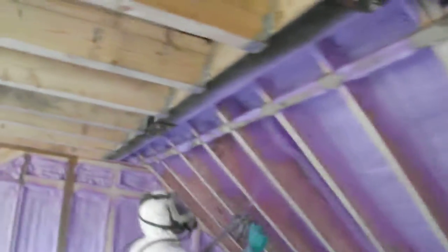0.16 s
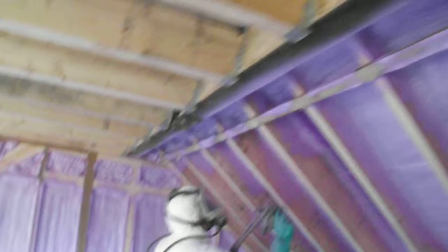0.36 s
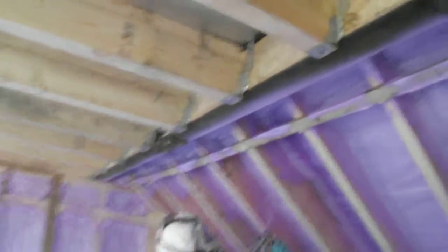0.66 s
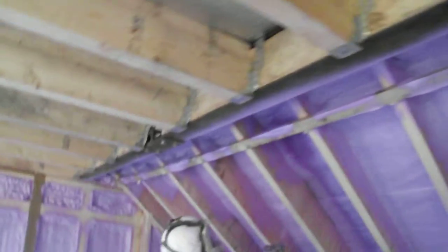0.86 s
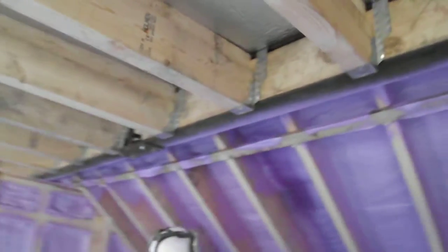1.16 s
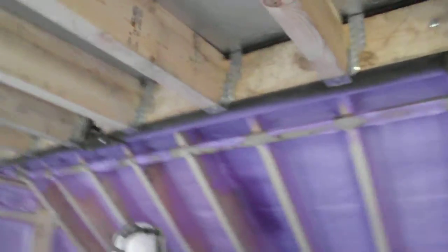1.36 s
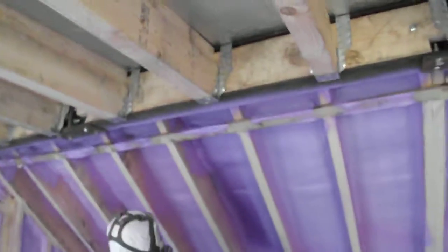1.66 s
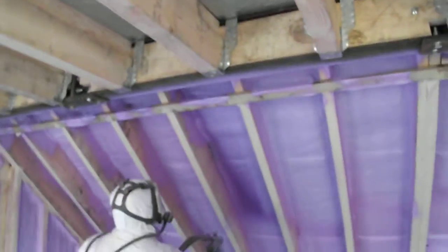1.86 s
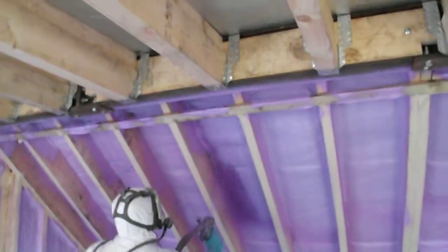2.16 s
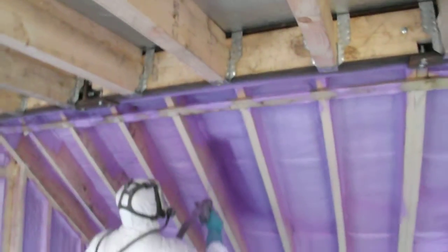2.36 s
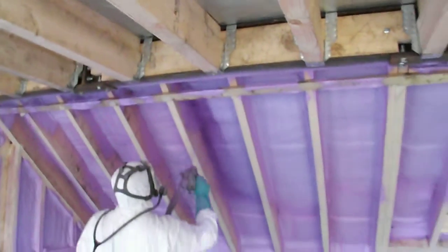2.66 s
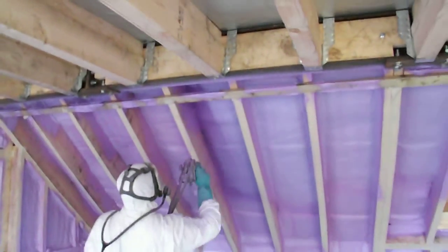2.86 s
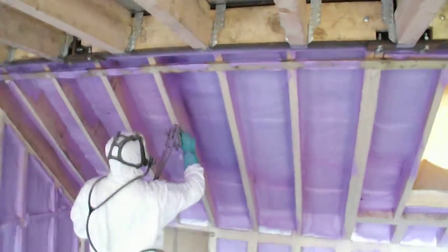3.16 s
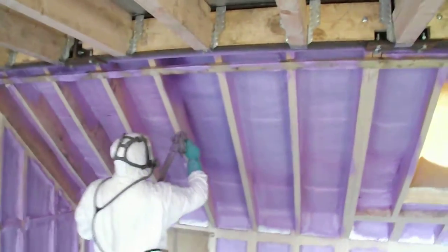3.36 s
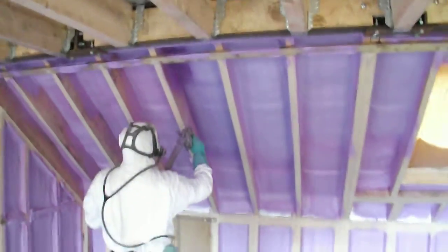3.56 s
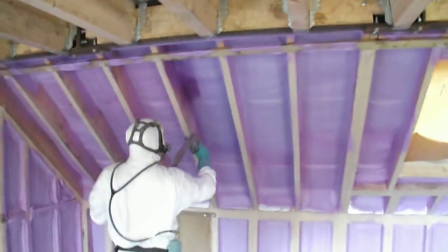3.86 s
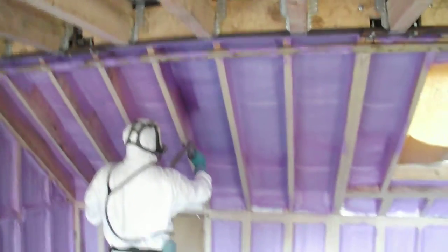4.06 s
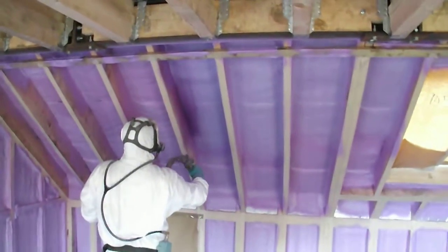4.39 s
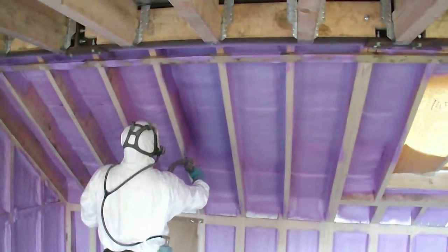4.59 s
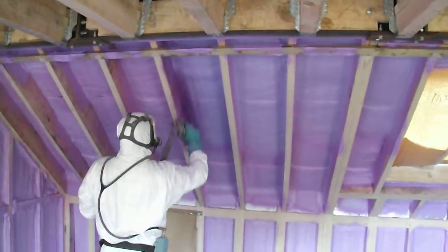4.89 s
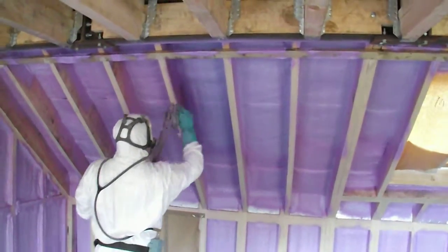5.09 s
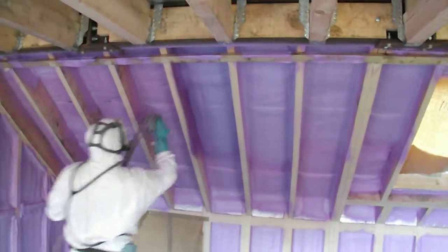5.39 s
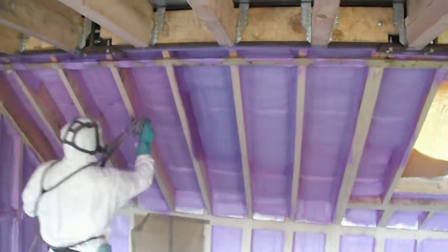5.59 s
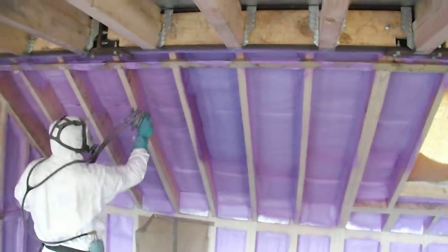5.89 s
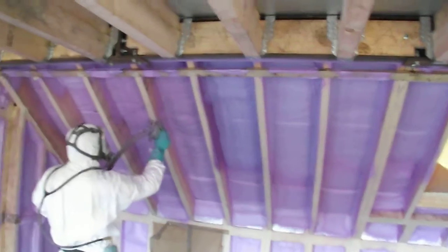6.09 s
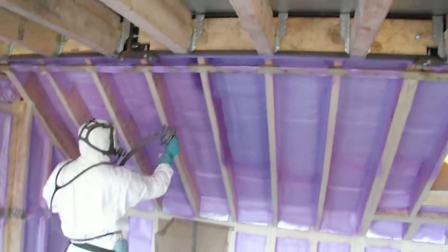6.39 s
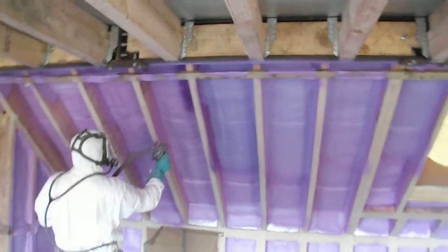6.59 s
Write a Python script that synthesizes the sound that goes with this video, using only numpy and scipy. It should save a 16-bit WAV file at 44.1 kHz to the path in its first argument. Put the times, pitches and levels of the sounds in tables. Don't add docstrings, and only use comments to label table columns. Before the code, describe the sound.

Bursts of bright, turbulent air and wet patter come from a foam gun already running. Short gaps hold only faint leaking air, purge puffs and thin whistles. Knocks on framing ring through the reverberant wooden space, two early, the hardest before four seconds, then softer echoing ones. The nearby microphone sounds peaky and piercing, with low bumping from the floor.

```python
import sys
import numpy as np
from scipy import signal
from scipy.fft import rfft, irfft, next_fast_len
from scipy.io import wavfile

SR = 44100
rng = np.random.default_rng(int(sys.argv[2]) if len(sys.argv) > 2 else 0)


def gain_from_db(level_db):
    decades = np.asarray(level_db, float) / 20
    return 10 ** decades


def generate_wav(sig):
    pcm = np.round(np.clip(np.atleast_2d(sig).T, -1, 1) * 32767).astype(np.int16)
    wavfile.write(sys.argv[1], SR, pcm)


N = 297234
T = np.arange(N) / SR
CLOCK = np.arange(0, N / SR + .002, .001)


def evened(x):
    return x / np.sqrt(np.mean(x ** 2) + 1e-20)


def read(points, hz):
    f, value = np.transpose(points)
    return np.interp(np.log(hz + 1), np.log(f + 1), value)


def played(table):
    s, *columns = np.transpose(table)
    return [np.interp(T, s, c) for c in columns]


def coloured(x, points):
    gain = gain_from_db(read(points, np.fft.rfftfreq(len(x), 1 / SR)))
    return evened(irfft(rfft(x) * gain, len(x)))


def flutter(hz):
    return evened(signal.lfilter(*signal.butter(1, hz / (SR / 2)), rng.standard_normal(N)))


def drops(per_s, spread_db):
    size = gain_from_db(spread_db * np.minimum(rng.exponential(1, N), 4))
    return evened(size * rng.choice([-1., 1.], N) * (rng.random(N) < per_s / SR))


def resonate(x, hz, width_hz):
    turn = np.exp(2j * np.pi * np.cumsum(hz) / SR)
    r = np.exp(-np.pi * width_hz / SR)
    smooth = signal.lfilter([1], [1, -2 * r, r * r], x / turn)
    return evened((turn * smooth).real)


def swell(start, end, db, rise, fall):
    slopes = np.minimum((CLOCK - start) * rise, (end - CLOCK) * fall)
    return gain_from_db(db + np.minimum(0, slopes)) ** 2


def level(power):
    return np.interp(T, CLOCK, 10 * np.log10(power))


def hums(rows, width_hz, rise, fall):
    out = np.zeros(N)
    for s, length, db, hz in rows:
        first = round((s - .05) * SR)
        part = slice(first, first + SR // 2)
        tone = resonate(rng.standard_normal(SR // 2), hz * np.ones(SR // 2), width_hz)
        envelope = gain_from_db(level(swell(s, s + length, db, rise, fall) + 1e-30)[part])
        out[part] += envelope * tone[:len(out[part])]
    return out


# (full flow reached [s], trigger released [s], air [dB], foam [dB], build-up [dB per s])
PASSES = [
    (-.1, 0.255, -14, -31, 62),
    (0.81, 1.534, -14.5, -30.5, 90),
    (2.35, 2.784, -14, -30.5, 47),
    (3.445, 4.28, -14.5, -30, 65),
    (4.847, 4.901, -13.5, -29, 66),
    (5.302, 5.55, -18, -33.5, 82),
    (5.82, 5.873, -15, -31.5, 23.5),
    (6.413, 7, -16.5, -32, 75.5),
]
# (peak [s], level [dB], fall [dB per s], foam spit [dB])
PULLS = [
    (0.529, -13, 112, -39.5),
    (1.779, -11.5, 124, -49.5),
    (3.028, -11, 178, -52),
    (4.486, -12, 163, -52),
]
PULL_RISE, PULL_HOLD_S = 570, 0.02
# (peak [s], level [dB], fall [dB per s], lingering leak [dB])
PURGES = [
    (.274, -9.5, 200, -31),
    (1.59, -10.5, 159, -46),
    (2.794, -7, 163, -33),
    (4.332, -11.5, 310, -45),
    (4.938, -9, 190, -34.5),
    (5.931, -10, 169, -56),
]
LINGER_S = [0.21, .2, .22, .06, 0.25, .1]
TONES = {"leak": (-10.5, -6, -3, -11.5, 1800), "spray": (-17.5, -12, -10, -22.5, 1905),
         "purge": (-31, -15, -16, -28, 1905), "pull": (-17, -11, -9, -23, 2148)}


def air_flow():
    purge_rise, linger_fall, air_shut = 186, 120, 134
    leak = gain_from_db(-36.5) ** 2
    for (s, _, _, db), length in zip(PURGES, LINGER_S):
        leak = leak + swell(s, s + length, db, purge_rise, linger_fall)
    kinds = {"leak": leak,
             "spray": sum(swell(a, b, db, rise, air_shut) for a, b, db, _, rise in PASSES),
             "purge": sum(swell(s, s, db, purge_rise, fall) for s, db, fall, _ in PURGES),
             "pull": sum(swell(s, s + PULL_HOLD_S, db, PULL_RISE, fall) for s, db, fall, _ in PULLS)}
    total = sum(kinds.values())
    colours = [level(sum(p * gain_from_db(TONES[k][c]) ** 2 for k, p in kinds.items()) / total) for c in range(4)]
    chamber_hz = sum(p * TONES[k][-1] for k, p in kinds.items()) / total
    driven = (total - leak) / total
    spraying = kinds["spray"] / total
    return level(total), *colours, *[np.interp(T, CLOCK, c) for c in (chamber_hz, driven, spraying)]


# (time [s], nearness [dB], turn to the microphone [dB],
# squareness to the boards [dB], jet tone [Hz])
HOLD = [(0, 2.5, 0, -0.5, 3030), (.2, 0.5, 0, 1.5, 3240), (.55, 1.5, 3.5, -0.5, 3000),
        (1.1, 0, 0, -1.5, 3240), (1.38, 2, 3, 3, 3520), (1.52, 0, 2.5, 1.5, 3420), (2.36, 2, -2.5, 2, 3120),
        (2.6, 0, 0.5, -2, 3100), (3.5, 1, -3, 0.5, 3000), (3.65, 1, -1.5, -1, 3160),
        (4.15, 0, 0.5, 3, 3190), (4.32, 2.5, 2, -3, 3440), (4.9, 0, -2, 1, 3160), (5.33, -1.5, 10, 4, 3060),
        (5.65, -2, 18, -17, 3150), (5.88, 2, 8, 6.5, 3220), (6.3, 7, -4, 6, 3180), (6.6, 0.5, 2, 1, 3230)]


def foam_flow():
    _, _, square_db, _ = played(HOLD)
    passes = sum(swell(a, b, db, rise, 400) for a, b, _, db, rise in PASSES)
    passes_db = level(passes + 1e-30) + square_db
    spits = sum(swell(s, s + PULL_HOLD_S, db, PULL_RISE, fall) for s, _, fall, db in PULLS)
    drip = gain_from_db(-51) ** 2
    return 10 * np.log10(gain_from_db(passes_db) ** 2 + gain_from_db(level(drip + spits)) ** 2)


# (frequency [Hz], level [dB per Hz])
AIR = [(1500, -40), (2200, -10.5), (2700, 1), (3500, 3.5), (4200, -5.5), (6000, -22), (16000, -12.5)]
EDGE = [(3000, -58), (3700, -3), (4200, 3), (4700, 2.5), (5000, -12), (6000, -57)]
FIZZ = [(4200, -31), (5000, -2.5), (6200, 2.5), (7200, -4), (8500, -6), (10000, -33)]
THROAT = [(900, -18), (1250, -7), (1600, -2), (2000, -9.5), (2500, -6), (3500, -49)]
SIZZLE = [(5500, -30), (7300, -7), (8600, -4), (9400, 2.5), (10300, -1.5), (11500, -5.5), (15000, -8),
          (16000, -4.5)]


def nozzle():
    near_db, turn_db, square_db, jet_hz = played(HOLD)
    flow_db, fizz_db, chamber_db, rim_db, mist_db, chamber_hz, driven, spraying = air_flow()
    flow_db = flow_db + driven * near_db
    turn_db = driven * turn_db
    wet = np.clip((foam_flow() - flow_db + 22.0) / 14, 0, 1)
    gust = rng.standard_normal(N) * gain_from_db(1.0 * flutter(110))
    stream = gust + wet * .55 * drops(300, 4.)

    hiss = gain_from_db(-15.5) * (coloured(stream, AIR) + 0.49 * resonate(stream, jet_hz, 1150))
    rim_db = rim_db + 7 * spraying * (jet_hz - 3200) / 1000
    rim = gain_from_db(rim_db + 0.41 * turn_db - 4.5) * coloured(stream, EDGE)
    fizz = gain_from_db(fizz_db + 0.55 * turn_db + 6.5) * coloured(stream, FIZZ)
    chamber_db = chamber_db + 0.16 * turn_db + 0.13 * driven * square_db - 8
    chamber = 0.75 * coloured(stream, THROAT) + 0.46 * resonate(stream, chamber_hz, 900)
    mist = gain_from_db(mist_db + turn_db + 19.0) * coloured(stream, SIZZLE)
    air = gain_from_db(flow_db) * (hiss + rim + fizz + gain_from_db(chamber_db) * chamber + mist)
    return gain_from_db(1.16 * flutter(9.5)) * air


# (start [s], length [s], sway [dB], board rumble [dB])
STEPS = [(0, .12, -28, -27), (0.172, 0.023, -42, -26), (0.613, 0.033, -36, -48), (1.267, .1, -36, -35),
         (1.527, .02, -36, -50), (1.68, 0.093, -38, -40.5), (2.288, 0.065, -45, -31.5),
         (2.424, 0.32, -37.5, -60), (3.368, 0.089, -33, -28), (4.0, 0.21, -36, -39), (4.555, 0.1, -51, -47),
         (4.808, 0.057, -34.5, -37), (5.01, 0.021, -38, -50), (5.327, .25, -22, -39),
         (5.6, 0.23, -28, -37.5), (5.867, 0.017, -33, -33), (5.98, 0.15, -38.5, -66), (6.217, .2, -40, -48),
         (6.513, 0.046, -24, -28), (6.71, .1, -23.5, -46)]


def footsteps(column, rest_db):
    return level(gain_from_db(rest_db) ** 2 + sum(swell(s, s + length, db[column], 340, 220) for s, length, *db in STEPS))


# (frequency [Hz], level [dB per Hz])
SPATTER = [(150, -15), (300, -4.5), (700, -1.5), (1200, -4.5), (1800, -5.5), (3000, -10.5)]
BOARDS = [(30, -44), (55, 7), (110, -0.5), (220, -9), (350, -16), (600, -45)]


def foam():
    spatter_db = foam_flow()
    feet_db = footsteps(1, -52.5)
    boards_db = 10 * np.log10(gain_from_db(spatter_db - 13) ** 2 + gain_from_db(feet_db) ** 2)
    patter = rng.standard_normal(N) * gain_from_db(0.5 * flutter(56)) + 0.48 * drops(400, 4.4)
    boards = gain_from_db(boards_db - 2.5) * coloured(rng.standard_normal(N), BOARDS)
    return gain_from_db(spatter_db + 3.5) * coloured(patter, SPATTER) + boards


def rafters(x):
    out = x.copy()
    for k in range(3):
        delays = rng.integers(150, 2600, 14)
        taps = np.zeros(2700)
        taps[delays] = rng.choice([-1., 1.], len(delays)) * gain_from_db(-16 - 60 * delays / SR / .5)
        share = np.sqrt(2 / 3) * np.cos(2 * np.pi * (0.7084 * T + k / 3))
        out += signal.oaconvolve(share * x, taps)[:N]
    return gain_from_db(-0.98) * out


# (frequency [Hz], level [dB per Hz])
WOBBLE = [(5, -23), (12, -13), (18, 0), (30, -1.5), (45, -11), (90, -26)]


def sway():
    joist_hz = 13 * (1 + 0.054 * flutter(3.1))
    bounce = np.sin(2 * np.pi * np.cumsum(joist_hz) / SR)
    push = 0.83 * coloured(rng.standard_normal(N), WOBBLE) + 1.24 * bounce
    return gain_from_db(footsteps(0, -46.5) + 1.0) * push


# (start [s], length [s], level [dB], tone [Hz])
CREAKS = [
    (.165, 0.035, -28, 300),
    (1.21, 0.079, -37, 298),
    (1.675, 0.027, -44.5, 343),
    (.36, 0.074, -34, 764),
    (2.04, 0.04, -33.5, 720),
    (2.55, 0.21, -40.5, 320),
    (3.385, 0.012, -31.5, 250),
    (3.517, 0.011, -28, 1180),
    (5.31, 0.032, -33, 850),
    (6.2, 0.28, -42.5, 315),
]


def creaks():
    return hums(CREAKS, 99, 1300, 500)


# (start [s], length [s], level [dB], tone
# [Hz])
WHISTLES = [
    (.258, 0.053, -25.5, 1950),
    (1.545, 0.029, -29, 1770),
    (1.62, 0.079, -44, 1740),
    (2.775, 0.036, -29.5, 1930),
    (1.785, 0.021, -20, 4470),
    (4.28, 0.046, -31, 1710),
    (4.87, 0.064, -29.5, 1590),
    (5.345, 0.0092, -27, 1830),
    (5.48, 0.076, -30, 1500),
]


def whistles():
    return hums(WHISTLES, 370, 1300, 500)


# (frequency [Hz], t60 [s])
LOFT = [(100, 0.76), (300, 0.5), (1000, 0.36), (3000, 0.42), (8000, 0.17)]


def loft():
    hz, t, z = signal.stft(rng.standard_normal(SR), SR, nperseg=256)
    decay = gain_from_db(-60 * t / read(LOFT, hz)[:, None])
    tail = signal.istft(z * decay, SR, nperseg=256)[1][:SR]
    tail = tail * np.clip(np.arange(SR) / SR / 0.0029 - .6, 0, 1)
    return tail / np.linalg.norm(tail)


# (time [s], crack [dB], crack length [s], loft echo [dB], timber ring [dB])
BLOWS = [
    (.3425, -4.5, 0.0077, -3.5, -23.5),
    (1.9628, -3, 0.0077, -1.5, -27.5),
    (3.692, 3, 0.017, -5.5, -9),
    (5.0934, -21, 0.011, 6, -40),
    (5.865, -40, 0.015, -8, -27.5),
    (6.4778, -23.5, 0.011, 6, -26.5),
]
# (thud at 220 Hz [dB], knock at 650 Hz [dB], slap at 1400 Hz [dB])
WOOD = [
    (2.5, 5.5, 4.5),
    (0, 9.5, -1.5),
    (1.5, 7, 0.5),
    (2, 17, 12.5),
    (6, 8, 7),
    (-5, 4, 4),
]
# (frequency [Hz], level [dB], t60 [s])
TIMBER = [
    [(85.4, -9, 0.97), (108, -2, 0.91), (133.7, -2.5, 0.86), (172, 5, 0.49)],
    [(122.6, -0.5, 0.99), (139.6, -1, 0.71), (225, -2, 0.2), (712, 5, 0.23)],
    [(76.3, -5, 0.38), (105.3, -7, 0.79), (149, -3, 0.56), (251, 2, 0.12), (330.7, -8.5, 0.42),
     (594, 6, 0.062)],
    [(1290, 9, 0.054)],
    [(497, 7, 0.13)],
    [(325, -1, 0.32)],
]


def blows():
    out, t = np.zeros(N + SR), np.arange(SR) / SR
    for blow, wood, modes in zip(BLOWS, WOOD, TIMBER):
        s, crack_db, length, echo_db, ring_db = blow
        thud_db, knock_db, slap_db = wood
        shape = [(70, thud_db + 3), (220, thud_db), (650, knock_db), (1400, slap_db),
                 (2300, 0.5), (4500, -2.5), (16000, -2)]
        crack = coloured(rng.standard_normal(SR), shape)
        crack = crack * np.clip(t / 0.00098, 0, 1) * np.exp(-(t / length) ** 2)
        echo = gain_from_db(echo_db) * np.sqrt(np.mean(crack ** 2)) * coloured(loft(), shape) * np.clip(t / length, 0, 1)
        ring = np.zeros(SR)
        for hz, db, t60 in modes:
            envelope = gain_from_db(db - 60 * t / t60 + 5 * flutter(26)[:SR])
            ring += envelope * np.sin(2 * np.pi * (hz * t + rng.random()))
        ring *= np.clip(t / 0.0022, 0, 1)
        at = round(s * SR)
        out[at:at + SR] += gain_from_db(crack_db) * (crack + echo) + gain_from_db(ring_db + 1.0) * ring
    return out[:N]


def ducking():
    down_db = [9 + db + level(swell(s + 0.015, s + 0.066, 0, 500, 52) + 1e-30) for s, db, *_ in BLOWS]
    return gain_from_db(-np.maximum(np.max(down_db, axis=0), 0))


# (start [s], length [s], level [dB], tone [Hz])
RATTLES = [
    (3.707, .003, -22, 3000),
    (3.72, 0.0034, -12, 3440),
    (3.727, 0.0016, -22, 3330),
    (3.735, 0.0057, -17, 2720),
    (3.746, 0.0032, -20, 3000),
    (3.755, 0.0092, -23, 3120),
    (3.776, 0.0047, -25, 3300),
    (1.976, .003, -24, 2800),
]


def rattles():
    return hums(RATTLES, 1800, 13000, 2900)


def scene():
    gun = ducking() * rafters(nozzle() + foam())
    return (gun + sway() + creaks() + whistles() + blows() + rattles())[None]


def top_cut(x):
    return signal.sosfilt(signal.butter(12, 15590, fs=SR, output="sos"), x)


# (resonance [Hz], sharpness [ratio])
PORT = (3180, 4.54)


def record(dry):
    hz, sharpness = PORT
    size = next_fast_len(N + 4096)
    u = np.fft.rfftfreq(size, 1 / SR) / hz
    heard = irfft(rfft(dry, size) / (1 - u ** 2 + 1j * u / sharpness), size)[:, :N]
    return top_cut(np.clip(heard, -.99, .99))


dry = scene()
out = record(dry)
generate_wav(out)
```